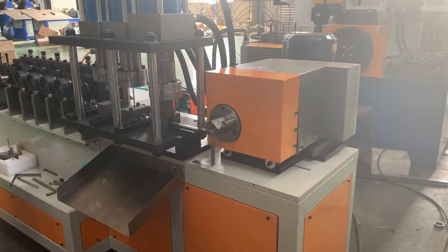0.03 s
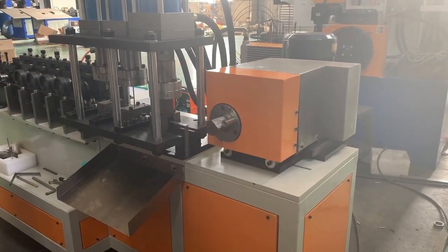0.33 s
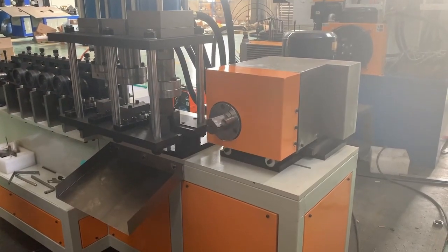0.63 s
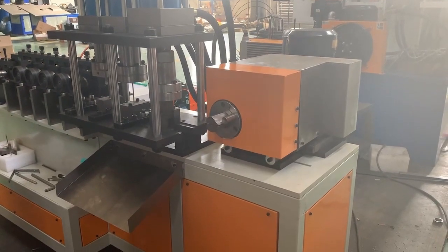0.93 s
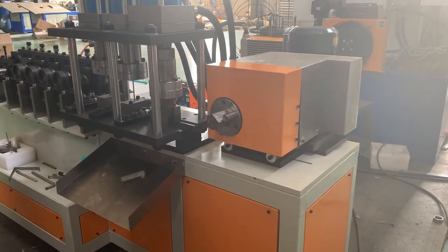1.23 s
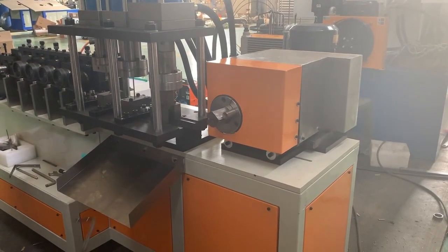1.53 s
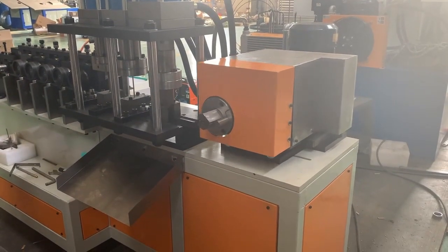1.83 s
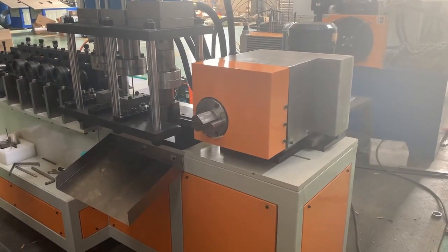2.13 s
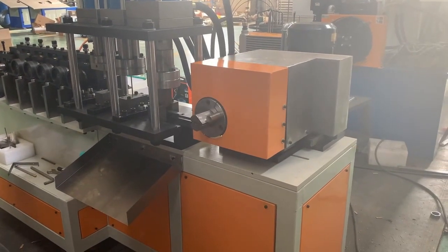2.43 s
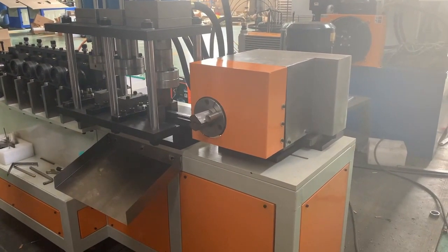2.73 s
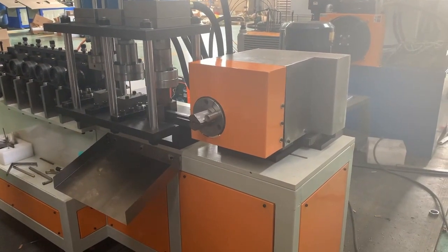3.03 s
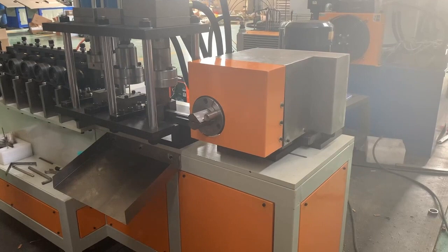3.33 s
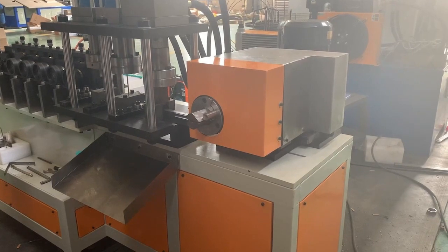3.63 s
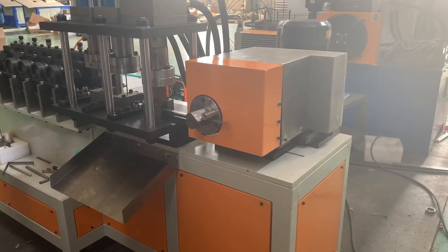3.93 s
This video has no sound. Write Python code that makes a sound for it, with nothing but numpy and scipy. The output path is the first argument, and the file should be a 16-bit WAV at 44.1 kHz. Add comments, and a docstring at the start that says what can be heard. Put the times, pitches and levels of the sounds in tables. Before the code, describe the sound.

Close by in a slightly echoing workshop, a hydraulic metalworking machine hums, whines and hisses. It clanks and thumps, drops a ringing piece down a sheet-metal chute, gives short scrapes and clacks, then strikes hard again.

```python
"""In a workshop, a step or two away, a hydraulic metal forming machine works through its cycle.
Two pumps whine, motors hum and oil hisses in the valves. Tools clank on the steel frame, the die snaps
through the metal and the cabinet booms as the rams start and stop. Slides scrape and clack on their
stops, and a finished piece clatters down a sheet-metal chute and rings on."""
import sys
import numpy as np
from scipy import signal
from scipy.fft import rfft, irfft
from scipy.io import wavfile
from scipy.ndimage import map_coordinates

SR = 44100
rng = np.random.default_rng(int(sys.argv[2]) if len(sys.argv) > 2 else 0)


def wav_record(signal):
    """Record a signal, one row per channel, as 16-bit PCM in the file named by sys.argv[1]."""
    frames = np.transpose(np.atleast_2d(signal))
    bounded = np.clip(frames, -1, 1)
    # unit amplitude maps onto the largest positive 16-bit level
    quanta = np.round(bounded * 32767).astype(np.int16)
    wavfile.write(sys.argv[1], SR, quanta)


N = 176400
T = np.arange(N) / SR

# Bright contact of steel on steel. Each row: frequency in Hz, level in dB per Hz, t60 in seconds.
CONTACT = [(1500, -39, .1), (3020, -6, 0.38), (4500, 8.5, 0.092), (5300, 2, .09), (6000, 12.5, .09),
           (6900, 11.5, .08), (8100, 5, 0.23), (8005, -18, 0.088)]


def amp(db):
    """Decibels to gain."""
    return 10 ** (np.asarray(db) / 20)


def unit(x):
    """Scale to an rms of one."""
    return x / np.sqrt(np.mean(x ** 2))


def curve(table, column=1):
    """An automation curve: straight lines through a column of a time table."""
    rows = np.array(table)
    return np.interp(T, rows[:, 0], rows[:, column])


def at_hz(table, hz, column=1):
    """Read a column of a frequency table on a log axis."""
    rows = np.array(table)
    return np.interp(np.log(np.maximum(hz, 1)), np.log(rows[:, 0]), rows[:, column])


def drift(rate_hz):
    """Smooth random modulation with an rms of one."""
    hz = np.arange(N // 2 + 1) * SR / N
    return unit(irfft(rfft(rng.standard_normal(N)) * np.exp(-(hz / rate_hz) ** 2), N))


def tone(hz):
    """A sine of rms one that follows a pitch curve."""
    return np.sqrt(2) * np.sin(2 * np.pi * (np.cumsum(hz) / SR + rng.random()))


def noise(colour, size, patchy_db=0, patch_hz=90.27):
    """Coloured noise; patchy_db adds the narrow random peaks and dips of a metal part."""
    hz = np.arange(size // 2 + 1) * SR / size
    patches = np.interp(hz / patch_hz, np.arange(1024), rng.standard_normal(1024))
    gain = amp(at_hz(colour, hz) + patchy_db * patches * np.minimum(hz / 1000, 1))
    low_cut = np.minimum(hz / colour[0][0], 1) ** 2
    return unit(irfft(rfft(rng.standard_normal(size)) * gain * low_cut, size))


def dense_ring(table, patchy_db=0, size=32768):
    """Countless overlapping modes: each octave takes its share of the blow and dies at its own rate."""
    hz = np.arange(size // 2 + 1) * SR / size
    spectrum = rfft(noise(table, size, patchy_db))
    centres = 62.5 * 2 ** np.arange(8)
    out = 0
    for centre, pick in zip(centres, np.eye(len(centres))):
        band = irfft(spectrum * np.interp(hz, centres, pick), size)
        decay = np.exp(-np.log(1000) * T[:size] / at_hz(table, centre, column=2))
        out += unit(band * decay) * np.sqrt(np.mean(band ** 2) * np.mean(decay ** 2))
    return out


def clear_ring(modes, size=65536, twin_gain=.79):
    """Decaying modes in close, beating pairs, slightly different on every blow."""
    t, out = T[:size], 0
    for (hz, db, t60), (phase, twin_phase, split) in zip(modes, rng.random((len(modes), 3))):
        twin_hz = hz + 16 * np.sqrt(hz / 1000) * (2 * split - 1)
        mode = np.sin(2 * np.pi * (hz * t + phase))
        twin = np.sin(2 * np.pi * (twin_hz * t + twin_phase))
        out += amp(db) * np.exp(-np.log(1000) * t / t60) * (mode + twin_gain * twin)
    return out


def crack(sound, rise, punch=.59, punch_s=.049, tail_db=-2.5):
    """A hard blow builds up, cracks briefly and drops to its ringing tail."""
    t = T[:len(sound)]
    attack = np.sqrt(np.minimum(t / rise, 1))
    overshoot = punch * np.exp(-np.maximum(t - rise, 0) / punch_s)
    return sound * attack * amp(tail_db) * (1 + overshoot)


def add(track, start, db, sound, rise):
    """Lay a sound into a track, fading it in over rise seconds."""
    i = int(start * SR)
    part = sound[:N - i]
    track[i:i + len(part)] += amp(db) * part * np.minimum(T[:len(part)] / rise, 1)


def pumps():
    """Two pumps whine near one pitch and beat against each other."""
    # The main pump, sagging under load, and a weaker one.
    # Each row: time in seconds, pitch in Hz, level in dB.
    main_pump = [(0, 898, -38.5), (.85, 891, -35.5), (1.02, 909, -54), (1.15, 869.5, -44), (1.5, 868, -51),
                 (1.85, 868, -45), (2.08, 862.7, -38), (2.22, 904.4, -45), (2.9, 904, -38),
                 (3.3, 897, -41.5), (3.52, 899, -53), (3.68, 871, -40), (4, 869, -39.5)]
    second_pump = [(0, 875, -39.5), (1.3, 904, -69), (1.599, 892, -40.5), (2, 899.5, -49),
                   (2.501, 884, -44.5), (3.4, 872, -48.5), (3.75, 888, -43), (4, 895, -40)]
    wander, flutter_db = .003, 1
    out = 0
    for pump in (main_pump, second_pump):
        hz = curve(pump) * (1 + wander * drift(25))
        whine = tone(hz) + amp(-15) * tone(2 * hz) + amp(-15.5) * tone(3 * hz)
        out += whine * amp(curve(pump, column=2) + flutter_db * drift(32))
    return out


def motors():
    """Motors hum and drone, wavering over the rumble of the shop."""
    # Hum at twice the shaft rate. Each row: time in seconds, level in dB.
    hum_level = [(0, -39.5), (.58, -42), (.9, -52), (1.45, -67), (1.62, -46), (1.73, -43), (1.95, -52),
                 (2.2, -47), (3.1, -50), (4, -59)]
    # Steady motor tones. Each row: pitch in Hz, level in dB.
    drone_tones = [(98, -51), (125, -53), (265, -50), (1035, -56)]
    # Motor and workshop rumble. Each row: frequency in Hz, level in dB per Hz.
    rumble_colour = [(25, -9), (45, -21.5), (75, -4.5), (135, 3), (260, -2), (420, -3), (700, -9),
                     (900, -6.5), (1150, -7.5), (1450, -14.5), (2500, -17), (8500, -58.5)]
    # The rumble is lowest while the rams stand still. Each row: time in seconds, level in dB.
    rumble_level = [(0, -37.5), (.6, -32.5), (1.05, -44.5), (1.6, -34), (1.92, -38), (2.25, -33),
                    (2.6, -36), (3.1, -33.5), (4, -37.5)]
    hum_hz, flutter_db = 49.3, 2.5
    hum = amp(curve(hum_level) + flutter_db * drift(12)) * tone(hum_hz * (1 + .036 * drift(8.3)))
    drone = sum(amp(db + 1.2 * drift(21)) * tone(hz * (1 + .00838 * drift(9.55)))
                for hz, db in drone_tones)
    rumble = amp(curve(rumble_level) + 3.05 * drift(10)) * noise(rumble_colour, N)
    return hum + drone + rumble


def oil(flicker_db=1):
    """Oil hisses through the valves, quieter while the pump holds pressure."""
    # Colour of the hiss. Each row: frequency in Hz, level in dB per Hz.
    hiss_colour = [(300, -30), (1400, -4), (2000, 2), (2800, 5), (4000, 2.5), (5100, -1), (6400, 0.5),
                   (7600, -6.5), (8500, -43.5)]
    # Its swells and dips. Each row: time in seconds, level in dB.
    hiss_level = [(0, -36), (.3, -38), (.55, -37), (.95, -37), (1.5, -39), (1.7, -44.5), (1.93, -44),
                  (2.25, -38), (2.5, -39.5), (2.8, -39.5), (2.95, -37.5), (3.22, -40.5), (3.45, -40),
                  (4, -41)]
    return noise(hiss_colour, N) * amp(curve(hiss_level) + flicker_db * drift(43))


def tools():
    """Each blow is a bright contact and a clank of the steel frame; press strokes add a hard snap."""
    # Tools hitting the frame. Each row: start in seconds, clank, ring and contact levels in dB,
    # rise in seconds.
    clanks = [(.013, -22, -37, -39.5, 0.0063), (.121, -60, -49.5, -35, 0.0039),
              (.515, -34.5, -48, -51, 0.013), (.594, -25, -31, -33, 0.0077),
              (.652, -28.5, -33, -31, 0.0054), (.830, -17.5, -17.5, -23.5, 0.0062),
              (.866, -27, -26, -36.5, 0.0035), (0.891, -36, -41, -33, 0.0031),
              (1.13, -30, -25, -46, 0.0091), (1.525, -40, -31.5, -49, 0.013),
              (2.068, -34.5, -45, -55, .006), (2.113, -32.5, -39, -39.5, 0.0062),
              (2.146, -30, -44, -37.5, 0.0036), (2.204, -27, -34.5, -47.5, 0.0044),
              (2.843, -32, -36, -33, 0.0027), (2.902, -51, -43, -35, 0.0079),
              (3.072, -19, -18.5, -22, 0.0026), (3.111, -36, -34, -50, .004), (3.284, -23, -20, -21, 0.01),
              (3.345, -43, -34.5, -27.5, 0.0038), (3.633, -29.5, -41, -46, 0.0064),
              (3.656, -33.5, -30, -33, 0.0049)]
    # The frame's dense clank. Each row: frequency in Hz, level in dB per Hz, t60 in seconds.
    frame_body = [(104, 1.5, 1), (200, -5.5, 0.12), (423, -1.5, 0.43), (706, -2, 0.49), (980, 3, 0.34),
                  (1390, -6, 0.61), (2410, -9, 0.41), (3400, -11, 0.59), (4600, -16.5, 0.48),
                  (5260, -22, .16), (8500, -53.5, 0.39)]
    # Its clear ring. Each row: pitch in Hz, level in dB, t60 in seconds.
    frame_modes = [(361, -14.5, 0.56), (458, -18, 0.2), (541.5, -9, 0.52), (894, -21, 0.38),
                   (1033, -20, .35), (1174, -20.5, 0.43), (1810, -28.5, 0.36), (2324, -19, .25),
                   (2580, -24.5, 0.36), (3060, -29.5, 0.2)]
    # The die breaks through at the foot of its stroke. Each row: start in seconds, level in dB.
    snaps = [(.836, -19), (3.077, -27.5)]
    # Colour of that snap. Each row: frequency in Hz, level in dB per Hz, t60 in seconds.
    snap_colour = [(900, -11, .04), (1700, -9.5, 0.056), (2400, 13, 0.081), (3150, -5, 0.066),
                   (4500, -1, 0.073), (5470, -3.5, .04), (6500, 0.5, .04), (8000, -8, 0.024)]
    out = np.zeros(N)
    for start, db, ring_db, contact_db, rise in clanks:
        add(out, start, db, crack(dense_ring(frame_body, patchy_db=6.5), rise), rise)
        add(out, start, ring_db, clear_ring(frame_modes), rise)
        add(out, start, contact_db, crack(dense_ring(CONTACT, patchy_db=3.5), rise), rise)
    for start, db in snaps:
        add(out, start, db, dense_ring(snap_colour, patchy_db=-1), rise=.0016)
    return out


def slide_stops(rise_s=.0014):
    """A slide meets its stop with a dry tick and one short ring."""
    # Hits on the stops. Each row: start in seconds, ring level in dB, pitch in Hz, t60 in seconds,
    # tick level in dB.
    clacks = [(.018, -22, 1125, 0.083, -26), (.662, -22, 840, 0.11, -31), (1.515, -32, 870, .16, -42),
              (2.121, -24.5, 890, 0.17, -23), (2.212, -30, 1100, 0.055, -21)]
    # The dry tick. Each row: frequency in Hz, level in dB per Hz, t60 in seconds.
    tick_colour = [(600, -4, .03), (1500, 8.5, .025), (3400, -3.5, .035), (8000, -31.5, .02)]
    out = np.zeros(N)
    for start, db, hz, t60, tick_db in clacks:
        ring = tone(np.full(N, hz)) * np.exp(-np.log(1000) * T / t60)
        add(out, start, db, ring, rise_s)
        add(out, start, tick_db, dense_ring(tick_colour), rise_s)
    return out


def cabinet():
    """The panels boom at each jolt of the rams, and their low modes shudder under load."""
    # Jolts of the rams. Each row: start in seconds, level in dB.
    thumps = [(0.021, -34), (.066, -28.5), (0.607, -17.5), (.648, -23), (0.743, -25.5), (0.839, -24.5),
              (0.885, -21), (1.105, -24), (1.144, -24.5), (2.104, -26.5), (2.172, -26), (2.799, -22.5),
              (2.843, -29), (3.08, -23.5), (3.112, -24.5), (3.291, -16), (3.328, -18), (3.459, -27),
              (3.682, -26)]
    # The panels' dense boom. Each row: frequency in Hz, level in dB per Hz, t60 in seconds.
    panel_body = [(45, -19.5, 0.26), (89, -1, 0.11), (146, -9.5, 0.4), (212, 7.5, 0.34), (305, -0.5, 0.72),
                  (395, 1, 0.17), (880, -33, 0.047)]
    # Their clear ring. Each row: pitch in Hz, level in dB, t60 in seconds.
    panel_modes = [(125.6, -7.5, 0.27), (156.7, -8, 0.63), (215.3, -6.5, 0.4), (267.4, -5.5, 0.13)]
    # Rams travelling under load. Each row: start in seconds, length in seconds, level in dB.
    shudders = [(.04, .22, -36), (.635, .17, -25), (.8, .19, -30), (1.26, .08, -36), (1.49, .15, -38.5),
                (2.83, .08, -29), (3.34, .21, -28.5), (3.67, .12, -29), (3.8, .14, -33)]
    # The panel modes they shake. Each row: pitch in Hz, level in dB.
    shudder_modes = [(128, 2), (156, 0.5), (216, -9)]
    thump_rise_s, body_db = .0066, -3.5
    fade_s, wander, flutter_db = .023, .045, 2
    out = np.zeros(N)
    for start, db in thumps:
        add(out, start, db + body_db, dense_ring(panel_body), thump_rise_s)
        add(out, start, db, clear_ring(panel_modes), thump_rise_s)
    for start, length, db in shudders:
        shake = sum(amp(mode_db + flutter_db * drift(22)) * tone(hz * (1 + wander * drift(37)))
                    for hz, mode_db in shudder_modes)
        envelope = np.exp(-np.maximum(T - length, 0) / fade_s)
        add(out, start, db, unit(shake) * envelope, fade_s)
    return out


def falling_piece():
    """The piece clinks at each bounce and leaves the sheet-metal chute ringing."""
    # Bounces down the chute. Each row: start in seconds, levels in dB of clatter, chute ring,
    # contact and piece ring, rise in seconds.
    bounces = [(1.008, -30.5, -52.5, -20.5, -17, 0.0086), (1.064, -21, -26.5, -29, -28.5, 0.0044),
               (1.171, -24.5, -27.5, -29.5, -23.5, 0.0051), (1.205, -42.5, -41.5, -46, -35, 0.004),
               (1.286, -24.5, -24.5, -25, -24, 0.0048), (1.325, -36.5, -35, -38, -46, 0.0074),
               (1.407, -38, -34.5, -53, -36, 0.0026), (1.486, -37.5, -32, -44, -33, 0.011)]
    # The chute's dense clatter. Each row: frequency in Hz, level in dB per Hz, t60 in seconds.
    chute_body = [(397, 2.5, 0.64), (780, -3, 0.2), (1160, 6, 0.53), (1400, -5.5, .6), (1780, 3, 0.27),
                  (2500, 1, 0.29), (3000, -14.5, .4), (3700, -2, 0.24), (4870, -21, 0.18), (6370, 2, 0.18),
                  (8500, -18, 0.24)]
    # The chute's long ring and the piece's short one. Each row: pitch in Hz, level in dB, t60 in seconds.
    chute_modes = [(546.5, -13.5, 1.7), (1007, -13, 2.6), (1040, -17.5, 1.8), (1140, -20.5, .6),
                   (1184, -10.5, 0.63), (1211, -20, 1.1), (1320, -21, .6), (1574, -13.5, 1),
                   (1620, -13.5, 0.66), (1750, -12.5, .7), (1804, -10.5, .7), (2153, -19.5, .9),
                   (2260, -18, 0.8), (2340, -20.5, .8), (2449, -15.5, 0.54), (2730, -13.5, 0.81),
                   (3150, -19.5, .8)]
    piece_modes = [(1780, -14, 0.14), (2390, -10.5, 0.099), (2480, -7, 0.12), (2660, -11, 0.17),
                   (3298, -11, 0.18), (4040, -17, 0.21), (4570, -14, 0.076), (5460, -10.5, 0.069),
                   (6040, -13, .14), (6450, -6.5, 0.061), (6900, -13.5, 0.11), (6907, -18, .14),
                   (7100, -14.5, .09), (7480, -12, 0.2)]
    out = np.zeros(N)
    for start, db, ring_db, contact_db, piece_db, rise in bounces:
        add(out, start, db, crack(dense_ring(chute_body, patchy_db=6.5), rise), rise)
        add(out, start, ring_db, clear_ring(chute_modes), rise)
        add(out, start, contact_db, crack(dense_ring(CONTACT, patchy_db=3.5), rise), rise)
        add(out, start, piece_db, crack(clear_ring(piece_modes), rise), rise)
    return out


def slide_scrapes():
    """Short runs of gritty friction make the guides squeak, sagging in pitch as the slides slow."""
    # Runs along the guides. Each row: start in seconds, level in dB, length in seconds,
    # brightness in dB per octave.
    scrapes = [(1.599, -39.5, 0.036, -27), (1.97, -42, 0.035, -20), (2.311, -35.5, 0.046, -3.5),
               (2.514, -38, 0.038, 0.5), (2.576, -55, 0.017, -7), (2.621, -38.5, .014, 16),
               (2.65, -47.5, 0.035, 11), (2.728, -32, 0.035, 1.5), (2.772, -33, 0.012, -1),
               (2.849, -39.5, 0.044, 14)]
    # Resonances of a slide. Each row: centre in Hz, width in Hz, level in dB.
    resonances = [(3020, 240, 0), (3420, 260, -5.5), (4390, 330, 0.5), (5800, 300, -2), (6230, 260, -1),
                  (7380, 480, -8.5)]
    grain_db, pitch_scatter, sag_per_s, release_s = -3, .02, .3, .0096
    hz = np.arange(N // 2 + 1) * SR / N
    body = sum(amp(db) / (1 + 2j * (hz - centre) / width) ** 2 for centre, width, db in resonances)
    low_hz, high_hz = resonances[0][0], resonances[-1][0]
    octaves = np.log2(np.clip(hz, low_hz, high_hz) / low_hz)
    out = np.zeros(N)
    for start, db, length, tilt_db in scrapes:
        grit = rng.standard_normal(N) * amp(grain_db * drift(400))
        friction = unit(irfft(rfft(grit) * body * amp(tilt_db * octaves), N))
        sag = sag_per_s * (np.minimum(T, 2 * length) - length / 2)
        speed = 1 + pitch_scatter * rng.standard_normal() - sag
        squeak = map_coordinates(friction, [np.cumsum(speed[:N // 8])], order=3)  # varispeed bend
        envelope = np.exp(-np.maximum(T[:len(squeak)] - length, 0) / release_s)
        add(out, start, db, squeak * envelope, rise=.0041)
    return out


def workshop_echo(sound, build_s=.0053):
    """Reflections build quickly into a diffuse tail whose treble dies first."""
    # The room's tail. Each row: frequency in Hz, level in dB per Hz, t60 in seconds.
    room = [(100, 1.5, 0.84), (1000, 3, 0.81), (3950, 5, 0.39), (8500, -10, 0.46)]
    tail = dense_ring(room)
    tail *= np.minimum(T[:len(tail)] / build_s, 1) ** 2
    return signal.fftconvolve(sound, tail / np.sqrt(np.sum(tail ** 2)))[:N]


def scene():
    """The working parts echo in the workshop, over a dry bed of pumps, motors and oil."""
    work = tools() + cabinet() + falling_piece() + slide_scrapes() + slide_stops()
    return (work + amp(-13) * workshop_echo(work) + pumps() + motors() + oil())[None]


def record(dry):
    """A steep low-pass takes off the top."""
    top_hz = 8150
    return signal.sosfilt(signal.ellip(10, .3, 80, top_hz, fs=SR, output="sos"), dry)


dry = scene()
out = record(dry)
wav_record(out)
```